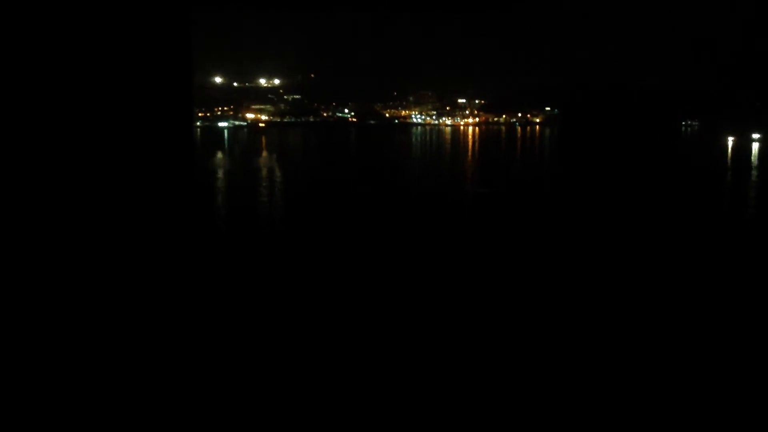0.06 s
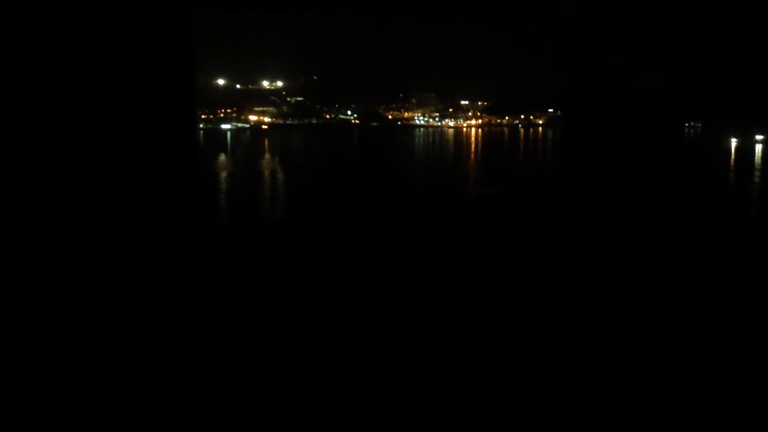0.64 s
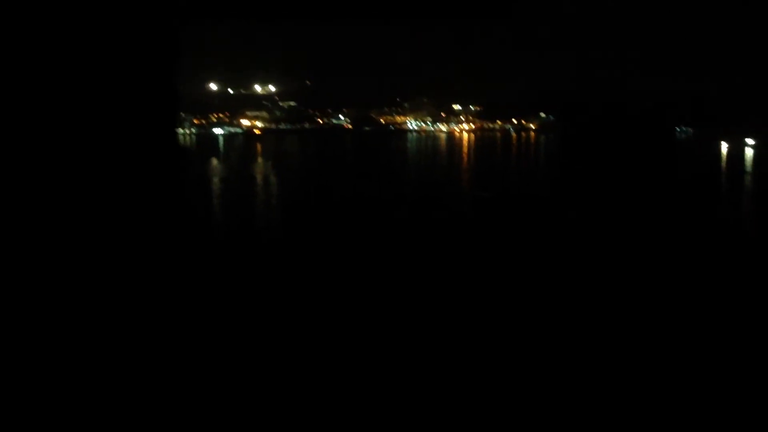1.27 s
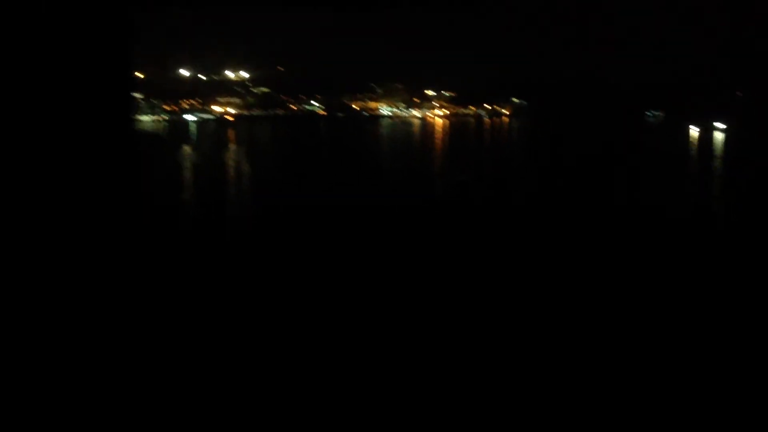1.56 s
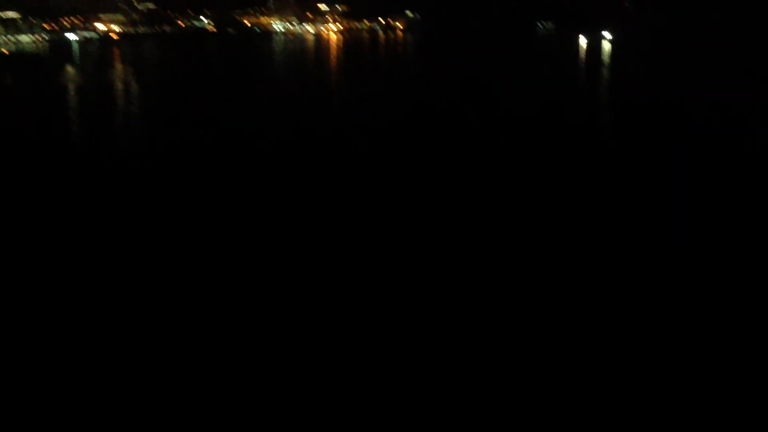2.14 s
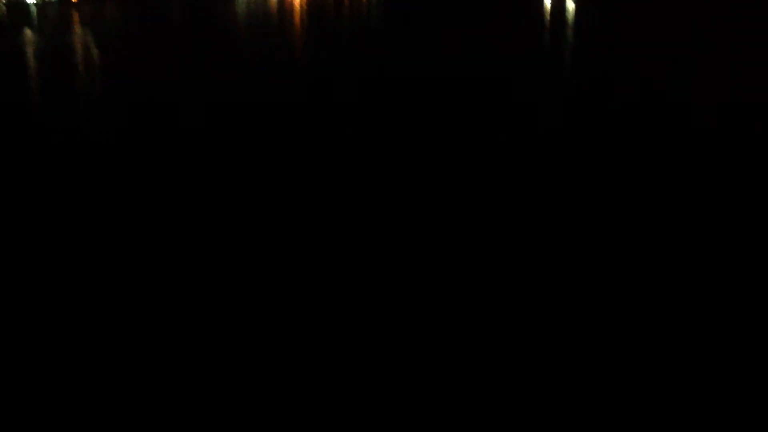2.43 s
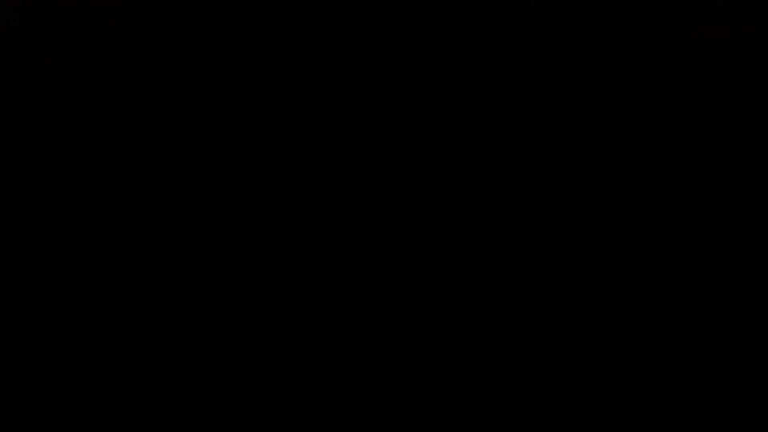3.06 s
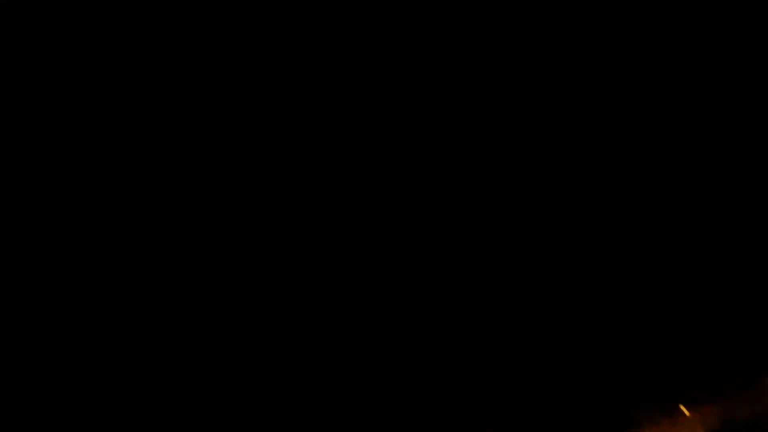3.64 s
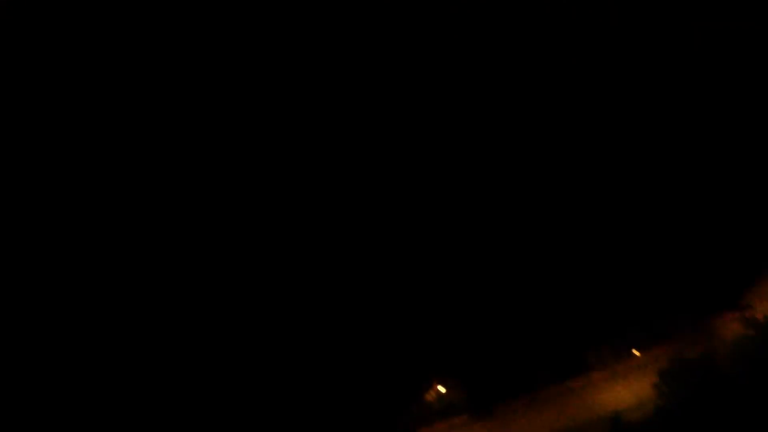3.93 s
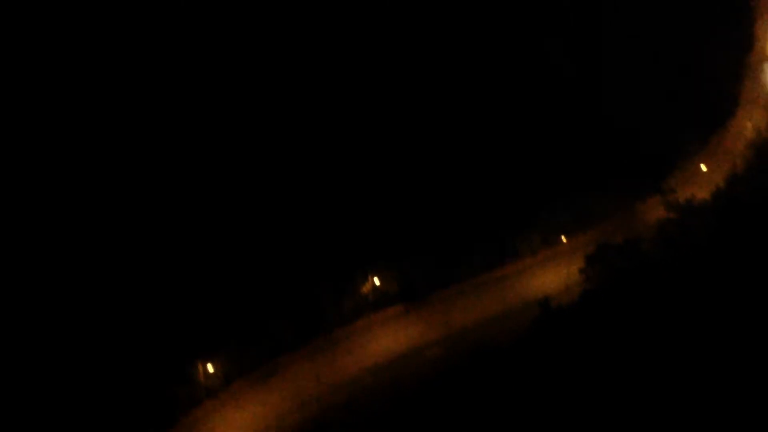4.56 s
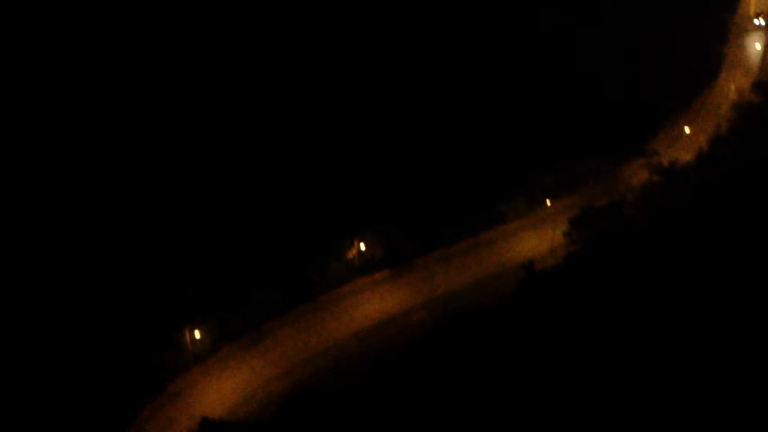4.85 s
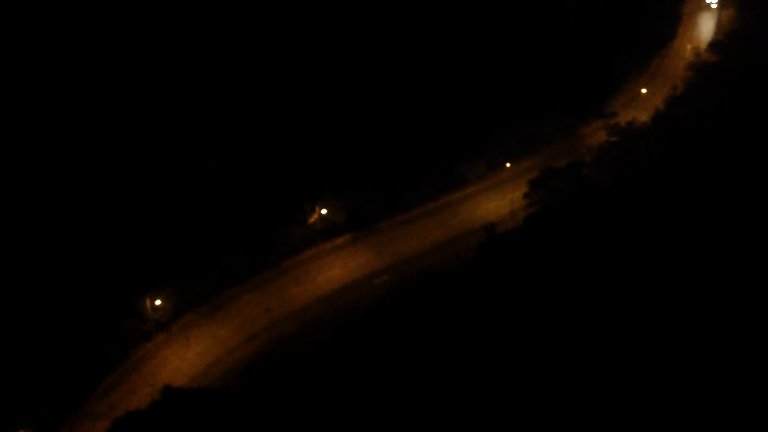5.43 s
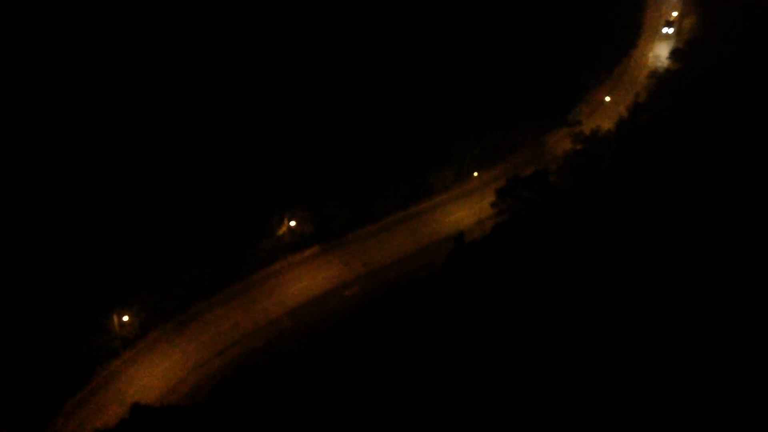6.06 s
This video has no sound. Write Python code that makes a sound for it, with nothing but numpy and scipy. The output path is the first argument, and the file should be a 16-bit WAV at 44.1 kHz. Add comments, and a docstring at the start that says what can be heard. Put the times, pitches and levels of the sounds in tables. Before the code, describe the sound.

A deep drone of distant machinery runs for the whole six seconds, heard from a height above a town at night, its close tones throbbing quickly against each other. Far road traffic blends into a steady rumble and soft tyre rush, with faint, thin whines drifting in and out. A slightly higher, fluttering engine tone swells just before 1 second, sinks toward 3.4 seconds, returns around 4 and peaks near 5.8. Faint whines of far vehicles pass at about 2.5 and 5.3 seconds. Close to the microphone, soft brief rustles come in the first third of a second, then near 0.9 and 1.3 seconds. Two dull double knocks on something small and hollow fall at about 3 and 3.2 seconds, the second pair softer and more muffled. One tiny bright tick comes at 4 seconds and a last faint rustle at 4.8.

```python
"""Distant machinery drones over a town at night, heard from a height. Its deep, close tones throb
against each other while a higher engine tone swells, fades and returns. Far road traffic blurs
into a steady roar, with faint whines from vehicles and machines. Near the microphone there are
a few soft rustles, two dull double knocks on something hollow and one tiny tick."""
import sys
import numpy as np
from scipy import signal
from scipy.fft import rfft, irfft
from scipy.io import wavfile

SR = 44100
rng = np.random.default_rng(int(sys.argv[2]) if len(sys.argv) > 2 else 0)


def wav_out(sig):
    """Save sig, one row per channel (or a flat mono array), as 16-bit PCM at SR to the path in sys.argv[1]."""
    wavfile.write(sys.argv[1], SR, np.round(np.clip(np.atleast_2d(sig).T, -1, 1) * 32767).astype(np.int16))


N = 277389
T = np.arange(N) / SR
HZ = np.fft.rfftfreq(N, 1 / SR)


def gain_of(db):
    """Turns decibels into a number to multiply by."""
    return 10 ** (np.asarray(db) / 20)


def evened(x):
    """Scales a signal to an average size (rms) of one."""
    return x / np.sqrt(np.mean(x ** 2) + 1e-20)


def curve(rows):
    """Joins (t/s, value) rows by straight lines."""
    return np.interp(T, *np.transpose(rows))


def colour(points):
    """Gain at every frequency from (f/Hz, level/dB) points, falling steeply beyond both ends."""
    hz, db = np.transpose(points)
    shape = gain_of(np.interp(np.log(HZ + 1), np.log(hz), db))
    return shape / (1 + (HZ / hz[-1] / 2) ** 8) / (1 + (hz[0] / 2 / (HZ + 1)) ** 8)


def peak(hz, width):
    """Gain at every frequency: one at hz, half at width to either side."""
    return 1 / (1 + ((HZ - hz) / width) ** 2)


def noise(density):
    """Noise with the given strength (amplitude per root hertz) at each frequency."""
    return irfft(rfft(rng.standard_normal(N)) * density, N) * np.sqrt(SR / 2)


def wander(rate_hz):
    """A smooth random wobble of average size one, up to about the given rate."""
    return evened(noise(np.exp(-(HZ / rate_hz) ** 2)))


def passing(s, half_s):
    """Gain of a source that is nearest at time s and has half the power half_s before and after."""
    return 1 / np.hypot(1, (T - s) / half_s)


# the machines' steady tones: f/Hz, level/dB
DRONE_TONES = [(123.63, -39.3), (115.32, -48.1), (109.9, -61), (103, -69), (82.5, -72), (77.5, -71),
               (58.5, -82)]
# how the whole drone rises and falls: t/s, level change/dB
DRONE_LOUDNESS = [(0, -0.6), (1.55, -1.1), (2.7, 0.55), (4.6, 0.7), (5.4, -0.8), (6.29, .5)]

def drone(in_step_s=.10, waver_db=.5, drift_turns=0.014):
    """Machines run at slightly different speeds; their tones throb each time they fall into step."""
    start_turns = rng.random()
    tones = np.zeros(N)
    for hz, db in DRONE_TONES:
        loudness = gain_of(db + waver_db * wander(1.6))
        turns = hz * (T - in_step_s) + start_turns + drift_turns * wander(3.7)
        tones += loudness * np.cos(2 * np.pi * turns)
    return np.sqrt(2) * gain_of(curve(DRONE_LOUDNESS)) * tones


# low rumble of exhausts: f/Hz, level/dB per Hz
RUMBLE_COLOUR = [(20, -100), (45, -98), (70, -105), (95, -86.5), (122, -70), (145, -69.5), (175, -70.5),
                 (210, -76.5), (300, -87), (600, -120)]
# roar of many engines: f/Hz, level/dB per Hz
ROAR_COLOUR = [(100, -100), (200, -89), (290, -85.5), (440, -84), (520, -82), (620, -83), (720, -88.5),
               (1000, -95.5), (1600, -96), (3000, -118)]
# pitches that stand out of the roar: f/Hz, width/Hz, level/dB per Hz
ROAR_HUMPS = [(232.8, 5.9, -76.5), (320, 9.5, -82), (355.4, 11.7, -73), (393.4, 9.1, -76), (496, 19, -84),
              (890, 23, -91), (994, 8.5, -85.5), (1540, 80, -91)]
# how the roar ebbs and flows: t/s, level change/dB
ROAR_LOUDNESS = [(0, 0), (.9, -0.2), (1.7, -0.3), (3.2, 1), (4.2, -2.5), (6.29, 1)]
# rush of tyres on the road: f/Hz, level/dB per Hz
TYRE_COLOUR = [(300, -105), (800, -90.5), (1300, -91), (1700, -91), (2000, -96.5), (2350, -99.5),
               (3300, -102.5), (4500, -112), (7000, -125)]
# how that rush ebbs and flows: t/s, level change/dB
TYRE_LOUDNESS = [(0, 0), (2, -1.84), (4.9, 0.36), (6.29, 1)]

def traffic(roar_waver_db=1.35, hump_waver_db=1.5, tyre_waver_db=0.78):
    """Many far vehicles: exhausts rumble steadily; engine roar and tyre noise waver in the night air."""
    rumble = noise(colour(RUMBLE_COLOUR))
    roar = noise(colour(ROAR_COLOUR)) * gain_of(roar_waver_db * wander(6))
    for hz, width, db in ROAR_HUMPS:
        roar += noise(gain_of(db) * peak(hz, width)) * gain_of(hump_waver_db * wander(2.1))
    tyres = noise(colour(TYRE_COLOUR)) * gain_of(curve(TYRE_LOUDNESS) + tyre_waver_db * wander(12.5))
    return rumble + gain_of(curve(ROAR_LOUDNESS)) * roar + tyres


# the higher engine tone comes in, sinks away and returns: t/s, level/dB
ENGINE_LOUDNESS = [(0.0, -54), (0.4, -56.7), (0.85, -37), (1.05, -42), (1.6, -37), (3.4, -47), (4.1, -40),
                   (5.6, -38.5), (5.8, -33.5), (5.92, -39), (6.29, -37.5)]

def engine(firing_hz=156.46, drift_turns=0.073, flutter_db=1.73, flutter_hz=5.3, scatter_db=-53):
    """An engine's firing tone flutters in the moving air; rough, scattered sound swells with it."""
    level_db = curve(ENGINE_LOUDNESS)
    turns = firing_hz * T + rng.random() + drift_turns * wander(2.3)
    tone = np.sqrt(2) * np.cos(2 * np.pi * turns)
    scatter = evened(noise(peak(hz=160, width=9)))
    tone *= gain_of(level_db + flutter_db * wander(flutter_hz))
    scatter *= gain_of(scatter_db + level_db - level_db.mean())
    return tone + scatter


# thin whines, some still growing at the end: f/Hz, level/dB, loudest at t/s, time to half power/s
MACHINE_WHINES = [(894, -69.5, 6.1, 3.4), (1218, -71.5, 9.9, 1), (1460, -67, 2, 1.8), (1547, -70, 7.1, 1.2),
                  (1957, -72.5, 5.6, 3.4), (2290, -91, 2.5, 4), (2520, -87, 3.7, 4), (2945, -92, 8.7, 2.3)]

def machine_whines(pitch_drift=.004, waver_db=3):
    """Faint tones of far machines drift in pitch and fade in and out on the air."""
    tones = np.zeros(N)
    for hz, db, s, half_s in MACHINE_WHINES:
        loudness = gain_of(db + waver_db * wander(3.6)) * passing(s, half_s)
        pitch_hz = hz * (1 + pitch_drift * wander(6.03))
        tones += loudness * np.cos(2 * np.pi * np.cumsum(pitch_hz) / SR)
    return tones


def stroke(s, rise, fade):
    """A loudness shape that rises from time s and then dies away."""
    age = np.maximum(T - s, 0)
    return np.minimum(age / rise, 1) * np.exp(-np.maximum(age - rise, 0) / fade)


# each soft brush: t/s, level change/dB, rise/s, fade/s
RUSTLE_STROKES = [(.08, -1.5, 0.022, 0.093), (.19, -11, 0.022, 0.08), (.305, -7, 0.011, .03),
                  (.922, 1.5, 0.028, 0.087), (.98, -14, 0.018, 0.049), (1.31, -7, 0.016, 0.054),
                  (4.81, -10, .015, .045)]
# the noise they all share: f/Hz, level/dB per Hz
RUSTLE_COLOUR = [(500, -113), (1200, -86.5), (2700, -94), (4900, -99), (5900, -106.5), (8700, -107),
                 (10500, -116), (15000, -125)]

def rustles(grain_db=2):
    """Short, soft brushing sounds; a fast wobble in loudness makes them slightly grainy."""
    pressure = sum(gain_of(db) * stroke(s, rise, fade) for s, db, rise, fade in RUSTLE_STROKES)
    return pressure * noise(colour(RUSTLE_COLOUR)) * gain_of(grain_db * wander(90))


# far vehicles going by: nearest at t/s, level/dB, time to half power/s
VEHICLE_PASSES = [(2.5, -59, 0.16), (5.3, -60.5, 1)]

def vehicle_whine(pitch_hz=578, width_hz=17):
    """The whine of passing vehicles, smeared by its many paths through the town."""
    power = sum((gain_of(db) * passing(s, half_s)) ** 2 for s, db, half_s in VEHICLE_PASSES)
    return np.sqrt(power) * evened(noise(peak(pitch_hz, width_hz)))


# two pairs of blows: t/s, level/dB, fade of the scuff/s, muffled above f/Hz
KNOCK_BLOWS = [(2.984, -44.5, .011, 1100), (3.003, -41.7, .028, 560), (3.21, -48, .008, 400),
               (3.237, -45.5, .008, 180)]
# the notes the hollow body rings with: f/Hz, relative level/dB, time to fade by 60 dB/s
BODY_NOTES = [(232, 4, .04), (334, 0, .14), (415, -4, .07), (517, -3, .13), (640, 1, .02), (960, 4, .012)]

def knocks(rise_s=0.0031, spread_s=0.024):
    """A push and a short scuff ring a small hollow body; a softer touch rings only its low notes."""
    t = T[:SR // 3]
    notes = sum(gain_of(db - 60 * t / t60) * np.sin(2 * np.pi * hz * t) for hz, db, t60 in BODY_NOTES)
    body = rfft(notes, N) * (HZ / (HZ + 150j)) ** 2  # a small body gives off little bass
    out = np.zeros(N)
    for s, db, fade, muffle_hz in KNOCK_BLOWS:
        push = np.exp(-2j * np.pi * HZ * s)  # the spectrum of one sharp click at time s
        scuff = stroke(s, rise_s, fade) * rng.standard_normal(N)
        blow = push + rfft(scuff / np.linalg.norm(scuff))
        ring = irfft(blow * body / np.sqrt(1 + (HZ / muffle_hz) ** 4), N)
        # the level counts the ring's energy as if spread over spread_s
        out += gain_of(db) * ring * np.sqrt(spread_s * SR) / np.linalg.norm(ring)
    return out


def tick(at_s=3.9901, level_db=-37.5, pitch_hz=10200, length_s=.00005):
    """One tiny bright tick: a high tone too short to hear as a note."""
    age = T - at_s
    return gain_of(level_db) * np.exp(-(age / length_s) ** 2) * np.cos(2 * np.pi * pitch_hz * age)


def scene():
    """The far town and the small near sounds, in one channel."""
    far = drone() + traffic() + engine() + machine_whines() + vehicle_whine()
    near = rustles() + knocks() + tick()
    return (far + near)[None]


# the microphone's own hiss: f/Hz, level/dB per Hz
HISS_COLOUR = [(20, -110), (4000, -109.5), (7500, -110), (11000, -112.5), (15000, -115)]

def record(dry, top_hz=15350):
    """The microphone adds its hiss; then the very highest treble is cut off."""
    with_hiss = dry + noise(colour(HISS_COLOUR))
    treble_cut = signal.firwin(801, top_hz, window=("kaiser", 9), fs=SR)
    return signal.oaconvolve(with_hiss, treble_cut[None], "same")


dry = scene()
out = record(dry)
wav_out(out)
```